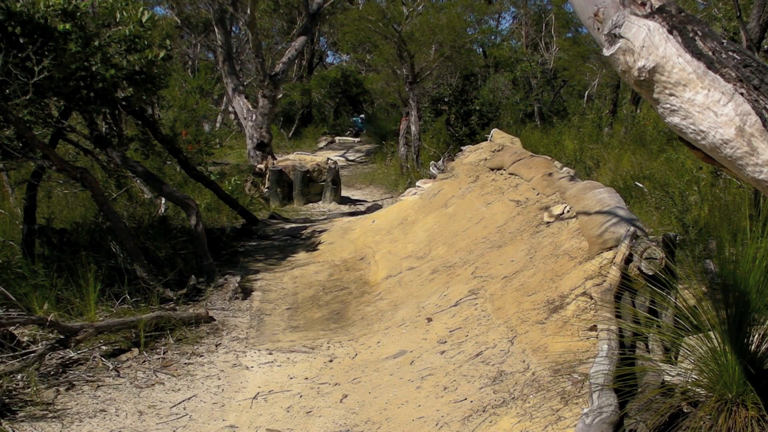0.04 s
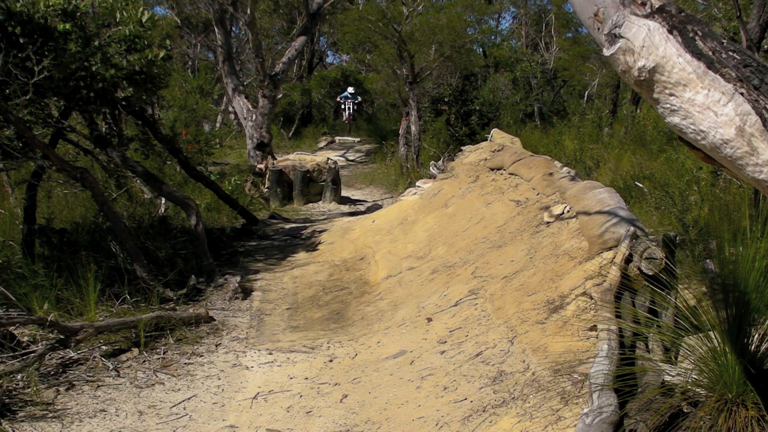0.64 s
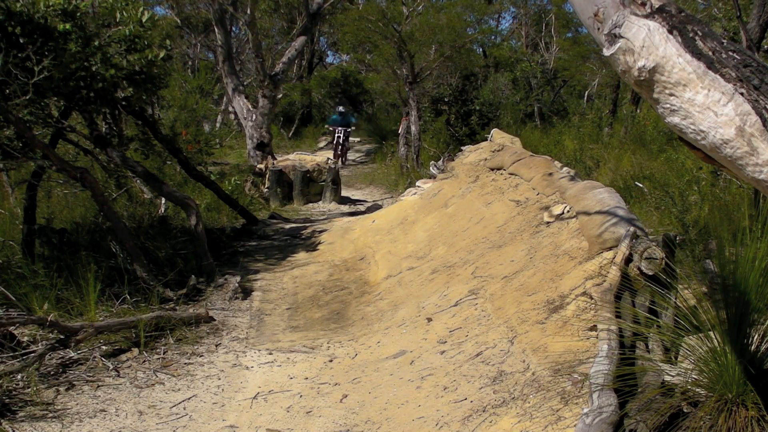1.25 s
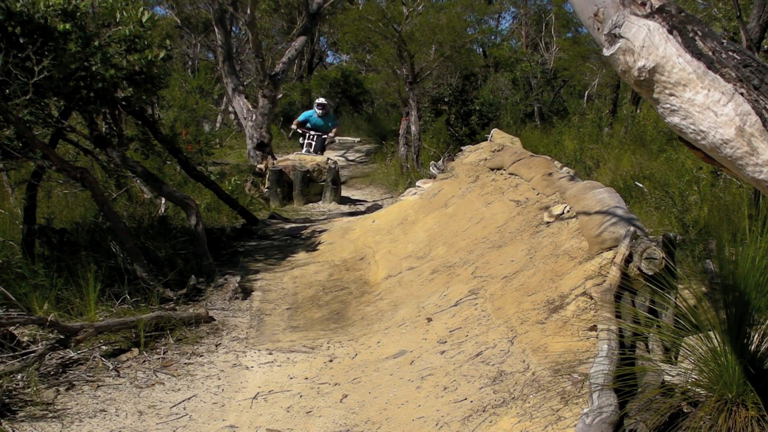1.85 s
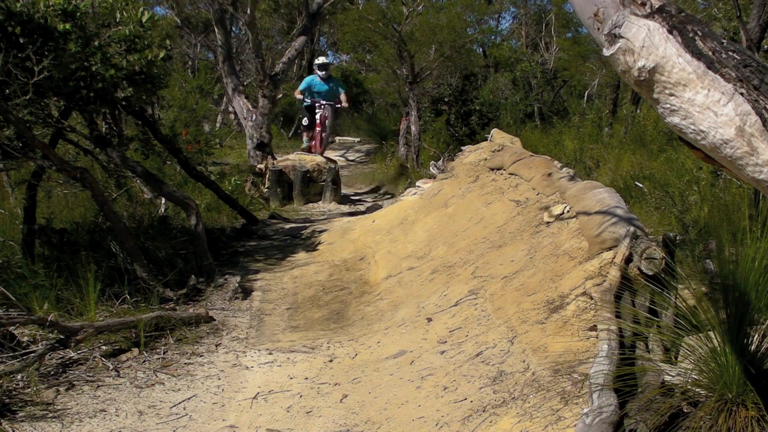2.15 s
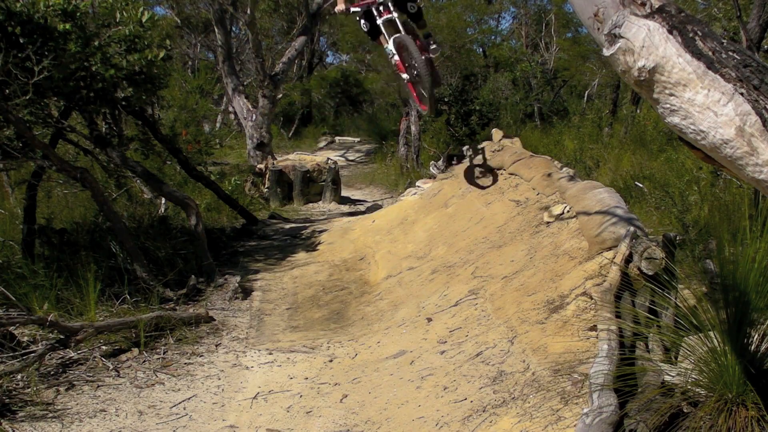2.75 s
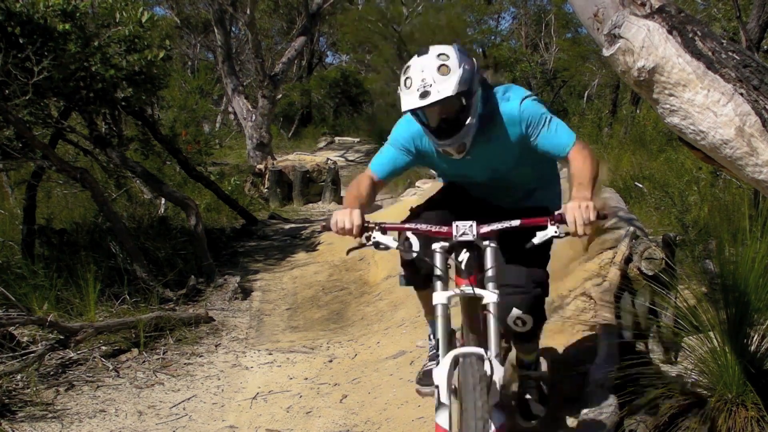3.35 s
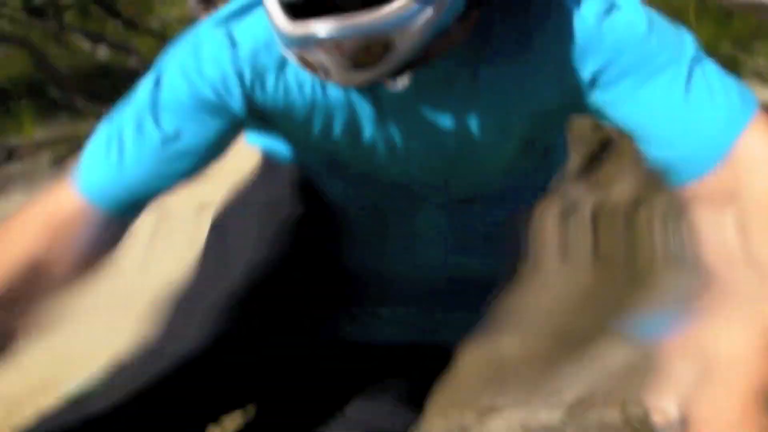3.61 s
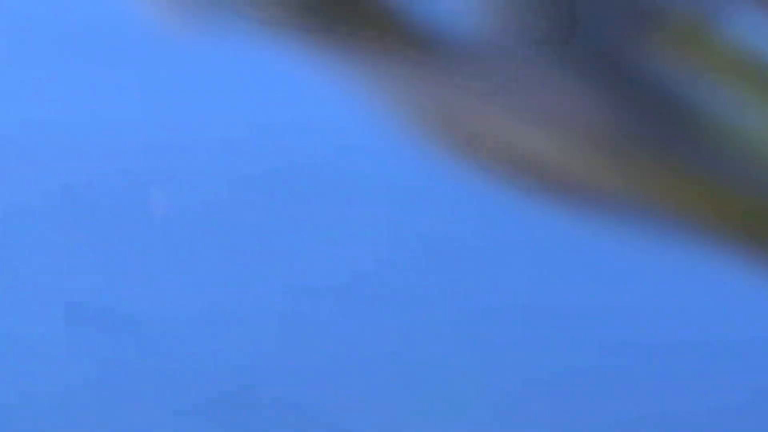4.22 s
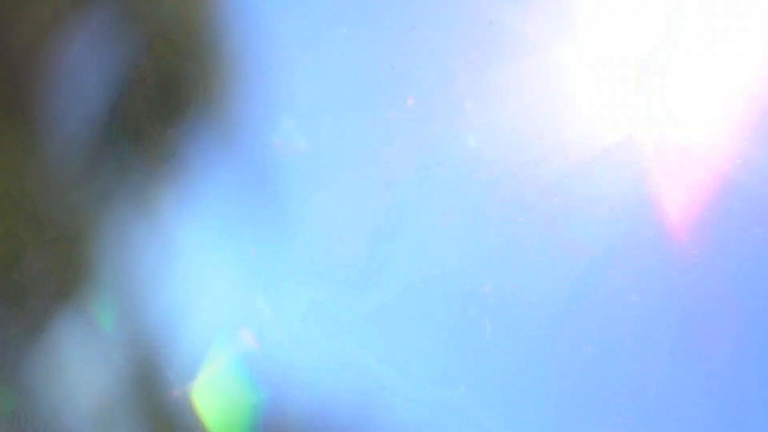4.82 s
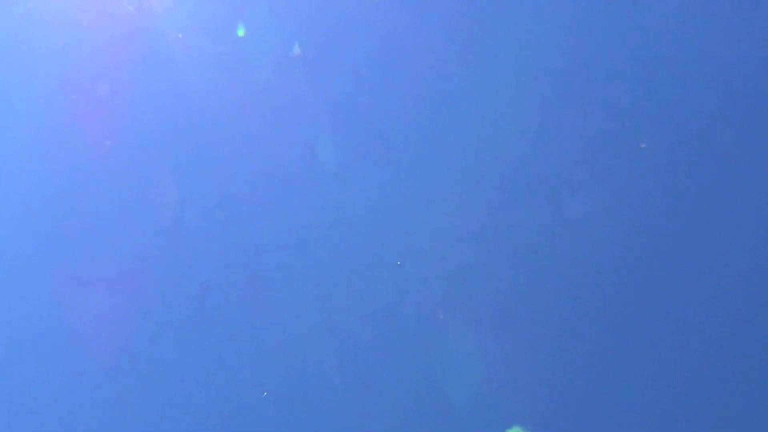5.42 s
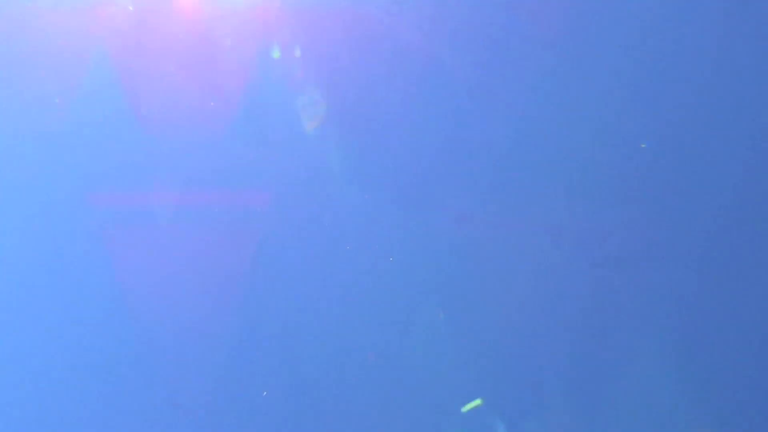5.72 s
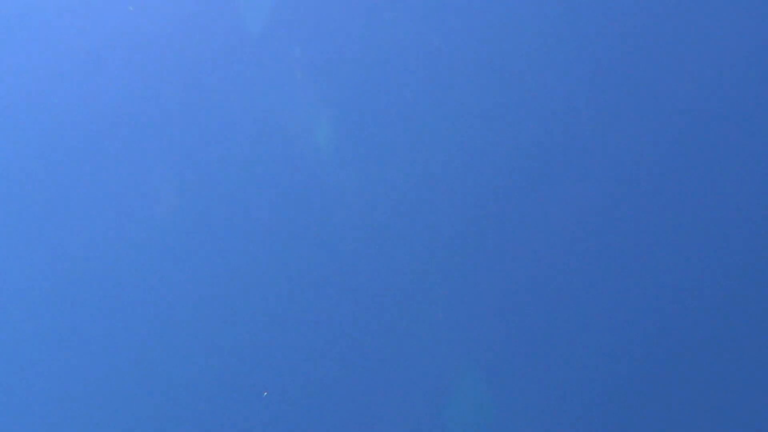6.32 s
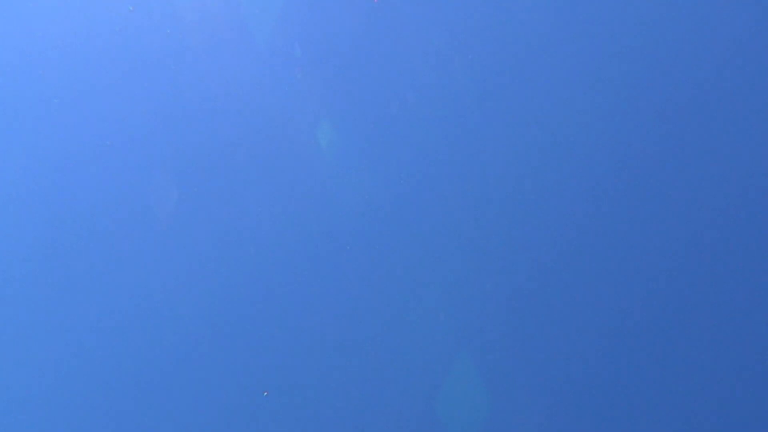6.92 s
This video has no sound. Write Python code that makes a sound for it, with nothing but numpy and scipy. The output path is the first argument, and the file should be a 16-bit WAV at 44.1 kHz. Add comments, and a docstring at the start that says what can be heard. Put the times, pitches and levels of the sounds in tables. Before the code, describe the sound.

Bike tyres crunch closer, land and skid; the microphone is hit and tumbles, clattering through grit, before things settle quietly in the scrub.

```python
"""Tyres hum and crunch on a dirt trail as a mountain bike nears, jumps, lands and skids into a camera.
The camera tumbles through grit and grass, its case knocking and scraping right at the microphone ports.
Then it lies still while bike and rider shift in the scrub with small thuds and clinks.
Rubbing is grainy noise in three bands; a blow is a click, a crunch, a low push and a short ring."""
import sys
import numpy as np
from scipy import signal
from scipy.fft import rfft, irfft, next_fast_len
from scipy.io import wavfile

SR = 44100
rng = np.random.default_rng(int(sys.argv[2]) if len(sys.argv) > 2 else 0)


def store_pcm(level_fs):
    """Save levels as 16-bit WAV."""
    pcm = np.round(np.clip(level_fs, -1, 1) * 32767).astype(np.int16)
    wavfile.write(sys.argv[1], SR, np.atleast_2d(pcm).T)


N = 315744
TIME = np.arange(N) / SR
LANDING_S, COLLISION_S, REST_S = 3.05, 3.528, 5.03


def from_db(db):
    """Decibels to gain."""
    return 10 ** (np.asarray(db) / 20)


def unit_rms(x):
    """Scale to rms 1."""
    return x / np.sqrt(np.mean(x ** 2) + 1e-20)


def unit_blow(blows):
    """Give each blow the energy of 10 ms at rms 1."""
    energy = np.sum(blows ** 2, axis=-1, keepdims=True).mean(axis=1, keepdims=True)
    return blows / np.sqrt(energy / (.01 * SR))


def gain_curve(times, db, fade_s=0.031):
    """Gain through level points, fading outside their span."""
    outside_s = np.maximum(times[0] - TIME, 0) + np.maximum(TIME - times[-1], 0)
    return from_db(np.interp(TIME, times, db)) * np.clip(1 - outside_s / fade_s, 0, 1)


def envelope(start, length, attack_s, release_s):
    """Rise around the start, hold, die away."""
    rise = np.clip((TIME - start) / attack_s + .5, 0, 1)
    return rise * np.exp(-np.clip((TIME - start - length) / release_s, 0, 30))


def drift(per_s):
    """Random wander of rms 1."""
    knots = rng.standard_normal(int(N / SR * 2000))
    return unit_rms(np.interp(TIME * per_s, np.arange(len(knots)), knots))


def at_hz(points, hz):
    """Interpolate on a log-frequency axis."""
    point_hz, value = np.transpose(points)
    return np.interp(np.log(np.maximum(hz, 1)), np.log(point_hz), value)


def resonate(x, hz, width_hz):
    """Two-pole resonance, peak gain 1."""
    r = np.exp(-np.pi * width_hz / SR)
    feedback = [1, -2 * r * np.cos(2 * np.pi * hz / SR), r * r]
    return signal.lfilter(np.array([1, 0, -1]) * (1 - r * r) / 2, feedback, x + 1e-18)


def bands(x):
    """Split into bass, middle and treble."""
    return [signal.sosfilt(signal.butter(4, edges_hz, "band", fs=SR, output="sos"), x)
            for edges_hz in ((15, 550), (550, 2700), (2700, 17000))]


def band_levels(db, bright_db, body_db):
    """Share a level among the bands: brightness tilts towards treble, body lifts the middle."""
    bright_db = np.atleast_1d(bright_db)
    weights = from_db([-bright_db, np.full(bright_db.shape, body_db), bright_db])
    return from_db(db) * weights / np.sqrt(np.sum(weights ** 2, axis=0))


def add_strokes(bed, strokes, attack_s, release_s, body_db):
    """Single strokes add their power to the band levels of a continuous rubbing."""
    power = bed ** 2
    for start, length, db, bright_db in strokes:
        stroke = band_levels(db, bright_db, body_db) * envelope(start, length, attack_s, release_s)
        power = power + stroke ** 2
    return np.sqrt(power)


# likeness of the two ports: f/Hz, correlation
PORT_CORRELATION = [(50, 0.72), (450, 0.92), (1100, 0.83), (2000, 0.96), (4000, 0.49), (12000, 0.055)]


def colour(pair, spectrum):
    """Filter two independent signals at minimum phase; mix to left and right, least alike in treble."""
    size = pair.shape[-1]
    padded = next_fast_len(size + 2048, real=True) // 2 * 2
    hz = np.arange(padded // 2 + 1) * SR / padded
    cepstrum = irfft(np.log(from_db(at_hz(spectrum, hz))))
    cepstrum[1:padded // 2] *= 2
    cepstrum[padded // 2 + 1:] = 0
    filtered = rfft(pair, padded) * np.exp(rfft(cepstrum))
    correlation = at_hz(PORT_CORRELATION, hz)
    mid = filtered[..., 0, :] * np.sqrt(1 + correlation)
    side = filtered[..., 1, :] * np.sqrt(1 - correlation)
    return irfft(np.stack([mid + side, mid - side], axis=-2))[..., :size]


# camera case resonances: f/Hz, width/Hz, boost at full coupling/dB
CASE_MODES = [(153, 16, -0.5), (407, 99, 9), (763, 150, 5.5), (1350, 290, 1.5), (1388, 29, 5),
              (1850, 67, 4), (3040, 540, 5), (5060, 450, 2), (6070, 300, 2.5)]


def case_ring(x, coupling):
    """The case rings along, more with tighter coupling."""
    for hz, width_hz, boost_db in CASE_MODES:
        x = x + (from_db(boost_db * coupling) - 1) * resonate(x, hz, width_hz)
    return x


def grains(per_s, spread_db, sand):
    """Grains of uneven size crack over a bed of fine sand."""
    onsets = rng.random(N) < per_s / SR
    sizes = from_db(spread_db * np.minimum(rng.exponential(1, N), 3))
    cracks = unit_rms(onsets * sizes * rng.standard_normal((2, N)))
    return cracks + sand * rng.standard_normal((2, N))


def crackle(per_s, decay_s):
    """Things break at random, each in a short broadband burst."""
    breaks = (rng.random(N) < per_s / SR) * rng.random(N) + 1e-9
    bursts = signal.lfilter([1], [1, -np.exp(-1 / (decay_s * SR))], breaks)
    return bursts * rng.standard_normal((2, N))


def pebbles(per_s, low_hz, high_hz, q, pitches=18):
    """Stones or twigs tap at random, each ringing briefly at one of a set of pitches."""
    taps = (rng.random(N) < per_s / SR) * rng.standard_normal(N)
    pitch_index = rng.integers(0, pitches, N)
    out = 0
    for k, hz in enumerate(np.geomspace(low_hz, high_hz, pitches)):
        ring = resonate(taps * (pitch_index == k), hz, hz / q) / hz
        out = out + np.stack([ring, np.roll(ring, rng.integers(-1, 2))])
    return unit_rms(out)


def friction(sound, levels, lump_db, lumps_per_s):
    """A rubbing contact catches and slips in lumps, least in the treble."""
    common = drift(lumps_per_s)
    lumps = [from_db(lump_db * depth * (.5 * common + drift(lumps_per_s))) for depth in (.8, 1, .55)]
    return sum(level * unit_rms(band * lump) for level, band, lump in zip(levels, bands(sound), lumps))


# open air: f/Hz, level/dB
AIR_SPECTRUM = [(25, -26), (55, -1), (110, 4.5), (200, -5.5), (280, -13), (420, 1.5), (750, -8),
                (1900, -15), (6000, -16.5), (8000, -21), (16000, -18)]


def air():
    """Steady, faint outdoor noise."""
    return from_db(-54.5) * unit_rms(colour(rng.standard_normal((2, N)), AIR_SPECTRUM))


def drone(start_s=6.3, hz=84, width_hz=10):
    """A faint low rumble sets in near the end."""
    noise = colour(rng.standard_normal((2, N)), AIR_SPECTRUM)
    rumble = resonate(resonate(noise, hz, width_hz), hz, 2 * width_hz)
    return from_db(-53) * unit_rms(rumble) * np.clip((TIME - start_s) / .1, 0, 1)


# bike and rider shifting: t/s, length/s, level/dB, brightness/dB
SCRUB_SHIFTS = [(5.327, 0.029, -40, 3.5), (5.422, 0.094, -44, -2.5), (5.533, 0.13, -43, 6),
                (5.638, 0.037, -38, 1.5), (5.76, 0.067, -40.5, 0), (6.624, 0.0089, -43.5, 5.5),
                (6.747, 0.28, -44.5, 0), (7.079, 0.089, -44.5, 3.5)]


def rustle_levels(attack_s=0.038, cloth_db=-55.5):
    """Debris fades and dulls over a rumble of cloth; each shift stirs it up."""
    age = np.maximum(TIME - REST_S, 0)
    bed = band_levels(db=-43.5 - 5.5 * age, bright_db=2.5 - 2.5 * age, body_db=-1.7)
    bed[0] = np.hypot(bed[0], from_db(cloth_db))
    bed *= np.minimum(age / attack_s, 1)
    return add_strokes(bed, SCRUB_SHIFTS, attack_s, release_s=0.076, body_db=-0.5)


# leaves and sand: f/Hz, level/dB
LEAF_SPECTRUM = [(25, -19), (55, 0.5), (90, 7.5), (150, -2), (260, -7.5), (410, -1.5), (550, -4.5),
                 (750, -5.5), (1000, -4), (1900, -11.5), (3000, -23.5), (6000, -21.5), (7700, -26.5),
                 (14000, -24)]


def scrub():
    """Leaves and sand rustle, twigs tick, dry stalks snap."""
    levels = rustle_levels()
    leaves = colour(grains(per_s=1200, spread_db=2.5, sand=1.7), LEAF_SPECTRUM)
    rustle = friction(case_ring(leaves, coupling=0.52), levels, lump_db=2, lumps_per_s=70)
    twigs = from_db(-4) * levels[1] * pebbles(per_s=70, low_hz=650, high_hz=3200, q=6)
    stalks = colour(crackle(per_s=32, decay_s=.0015), LEAF_SPECTRUM)
    snaps = from_db(-7) * levels[2] * unit_rms(bands(stalks)[2])
    return rustle + twigs + snaps


# brushing wheel: t/s, f/Hz, level/dB
WHEEL_TONE = [(6.1, 520, -81), (6.18, 558, -50), (6.28, 600, -43), (6.36, 582, -53), (6.5, 544, -52),
              (6.58, 526, -65)]


def wheel_hum():
    """A wheel brushes the ground with a rough hum."""
    times, hz, db = np.transpose(WHEEL_TONE)
    phase = 2 * np.pi * np.cumsum(np.interp(TIME, times, hz)) / SR
    hum = unit_rms(drift(170) * np.sin(phase) + drift(170) * np.cos(phase))
    return hum * gain_curve(times, db)


# tyres pressing on the trail: t/s, length/s, level/dB
TYRE_LOADS = [(0.0, 0.13, -54), (0.12, 0.24, -58), (0.458, 0.22, -65.5), (0.959, 0.1, -56.5),
              (1.064, 0.19, -48.5), (1.303, 0.17, -54.5), (1.498, 0.71, -52.5), (1.955, 0.15, -48),
              (2.062, 0.088, -41.5)]


def trail_levels(fall_db_per_s=35, floor_db=-71):
    """Hum follows tyre load; gravel follows less and lingers; sand spray grows until the landing."""
    hum = np.max([from_db(db) * envelope(start, length, attack_s=0.0087, release_s=0.046)
                  for start, length, db in TYRE_LOADS], axis=0)
    load_db = 20 * np.log10(hum + 1e-9) - np.mean([db for _, _, db in TYRE_LOADS])
    fall_db = fall_db_per_s * TIME
    thrown_db = np.maximum.accumulate(-53 + 0.84 * load_db + fall_db) - fall_db
    to_landing_s = np.maximum(LANDING_S - TIME, 0)
    thrown = from_db(thrown_db - to_landing_s)   # gains 1 dB/s as the bike nears
    spray = from_db(-50.5 - 29 * to_landing_s)
    gravel = np.sqrt(thrown ** 2 + spray ** 2 + from_db(floor_db) ** 2)
    return hum, gravel * (TIME < LANDING_S)


# tyre roar and gravel crunch: f/Hz, level/dB
TYRE_SPECTRUM = [(100, -11.5), (170, -18), (225, -7), (290, -12.5), (400, 0), (490, -3), (600, -6),
                 (750, -17), (1500, -43)]
GRAVEL_SPECTRUM = [(400, -4), (800, -4.5), (1900, 0.5), (2700, -4), (6000, -4.5), (7500, -15.5),
                   (11000, -10.5), (16000, -24)]


def tyres():
    """Tread knobs sing at a steady pitch, crunch gravel and flick stones."""
    hum_level, gravel_level = trail_levels()
    roar = unit_rms(colour(grains(per_s=3000, spread_db=5.7, sand=0.84), TYRE_SPECTRUM))
    tread = unit_rms(resonate(roar, hz=469, width_hz=63))
    hum = unit_rms((roar + 0.73 * tread) * from_db(1.5 * drift(41)))
    gravel = colour(grains(per_s=700, spread_db=2.9, sand=2.2), GRAVEL_SPECTRUM)
    crunch = unit_rms(gravel * from_db(1.2 * drift(60)))
    stones = from_db(-15) * pebbles(per_s=30, low_hz=1500, high_hz=6000, q=3)
    return hum_level * hum + gravel_level * (crunch + stones)


# coasting hiss: t/s, level/dB
HISS_LEVELS = [(0, -109), (1.6, -71), (2.0, -68), (2.3, -51), (2.7, -56.5), (3.06, -45.5)]
# its colour: f/Hz, level/dB
HISS_SPECTRUM = [(4000, 4), (7500, 3), (10000, 6.5), (12000, 9.5), (14000, 14.5), (16000, 9.5)]


def coasting():
    """The coasting bike hisses thinly."""
    hiss = unit_rms(colour(rng.standard_normal((2, N)), HISS_SPECTRUM))
    return gain_curve(*np.transpose(HISS_LEVELS)) * hiss


# metal clinks, dry ticks and snaps, a short gritty hiss: t/s, level/dB, f/Hz, t60/s, ring share
CLINKS_AND_SNAPS = [(0.423, -53.5, 5000, 0.18, 0), (.555, -51, 3200, .12, 0),
                    (1.028, -43.5, 3260, 0.039, 0), (1.122, -20, 3200, 0.022, 0.64),
                    (1.1226, -23, 5430, 0.021, 0.53), (1.203, -44, 3300, 0.084, 0),
                    (2.2022, -26.5, 2920, 0.028, 0.5), (2.22, -35.5, 5600, 0.051, 0.03),
                    (2.2771, -29, 1970, 0.031, 0.06), (2.2785, -24.5, 4940, 0.03, 0.14),
                    (3.321, -6.5, 5450, 0.022, 0.54), (4.2822, -10, 11500, 0.021, 0),
                    (4.305, -16.5, 10000, 0.049, 0), (4.714, -30.5, 12100, 0.41, 0.06),
                    (6.138, -42, 1850, 0.24, 0.6), (6.226, -39.5, 2480, .07, 0.24),
                    (6.309, -36.5, 2460, 0.05, 0.43), (6.227, -37, 13000, .07, 0.4),
                    (6.308, -36, 13000, .07, 0.43), (6.572, -39, 11000, 0.097, 0)]


def clinks_and_snaps(size=16384, attack_s=0.00075):
    """Metal clinks ring at one pitch; dry ticks, snaps and a short hiss are decaying noise bands."""
    out = np.zeros((2, N + size))
    age = np.arange(size) / SR
    for start, db, hz, t60, share in CLINKS_AND_SNAPS:
        ring = np.sin(2 * np.pi * hz * age + rng.normal(0, 0.13, (2, 1)))
        noise = unit_rms(resonate(rng.standard_normal((2, size)), hz, 0.73 * hz * (1 - share) + 1))
        level = from_db(db - 60 * age / t60) * (1 - np.exp(-age / attack_s))
        at = int(start * SR)
        out[:, at:at + size] += level * (share * ring + (1 - share) * noise)
    return out[:, :N]


# tyre biting into dirt: t/s, length/s, level/dB, brightness/dB
TYRE_BITES = [(3.058, 0.012, -31.5, 17), (3.104, .035, -28.5, -6), (3.115, 0.072, -23, 12.5),
              (3.385, 0.027, -31.5, -6), (3.426, 0.032, -24.5, 4), (3.487, 0.017, -27.5, -3.5)]
# ploughed dirt: f/Hz, level/dB
DIRT_SPECTRUM = [(25, -19), (70, 2), (170, -2.5), (290, -3), (400, 0.5), (560, 1.5), (900, 2), (1750, 7),
                 (2700, -6), (5400, -4), (7600, -14.5), (11000, -6), (16000, -16)]


def skid(attack_s=0.01, release_s=0.0091, body_db=-2):
    """The tyres land and plough loose dirt, throwing stones and crushing gravel."""
    contact = envelope(LANDING_S, COLLISION_S - LANDING_S, attack_s, release_s)
    bed = band_levels(db=-30, bright_db=2.5, body_db=body_db) * contact
    levels = add_strokes(bed, TYRE_BITES, attack_s, release_s, body_db)
    dirt = colour(grains(per_s=3000, spread_db=2.5, sand=1), DIRT_SPECTRUM)
    plough = friction(case_ring(dirt, coupling=0.2), levels, lump_db=1.5, lumps_per_s=81)
    stones = from_db(-1.5) * levels[1] * pebbles(per_s=150, low_hz=574, high_hz=2500, q=12)
    gravel = from_db(-10) * levels[2] * pebbles(per_s=500, low_hz=3060, high_hz=14300, q=20)
    cracks = colour(crackle(per_s=110, decay_s=.0008), DIRT_SPECTRUM)
    crushed = from_db(-11.5) * levels[2] * unit_rms(cracks)
    return from_db(-2.5) * plough + stones + gravel + crushed


# case digging in: t/s, length/s, level/dB, brightness/dB
CASE_SCUFFS = [(3.562, 0.059, -17.5, 4), (3.673, 0.042, -21, 1.5), (3.735, 0.044, -19, 7),
               (3.868, 0.038, -21, 3.5), (3.982, 0.043, -22.5, 0), (4.114, 0.025, -23.5, -4),
               (4.153, 0.03, -19, 2.5), (4.422, 0.064, -24.5, -0.5), (4.499, 0.03, -20, -3.5),
               (4.542, 0.061, -19, 0.5), (4.616, 0.02, -23, 1.5), (4.798, 0.029, -21, -2),
               (4.842, 0.032, -24.5, -5)]
# plastic on grit: f/Hz, level/dB
PLASTIC_SPECTRUM = [(25, -25), (60, -10), (120, 1), (180, -1), (260, -8.5), (370, 1.5), (600, -7),
                    (1700, -2.5), (2500, -6.5), (6000, 2), (7700, -6.5), (10500, -1.5), (14000, -2),
                    (16000, -11.5)]


def case_slide(length_s=1.478, attack_s=0.028):
    """The case slides, quieter and duller as it slows, scraping harder where a corner digs in."""
    age = np.maximum(TIME - COLLISION_S, 0)
    bed = band_levels(db=-27 - 4.5 * age, bright_db=1 - age, body_db=-2)
    bed *= envelope(COLLISION_S, length_s, attack_s, release_s=0.094)
    levels = add_strokes(bed, CASE_SCUFFS, attack_s, release_s=0.019, body_db=1)
    grit = colour(grains(per_s=1500, spread_db=2, sand=.8), PLASTIC_SPECTRUM)
    scrape = friction(case_ring(grit, coupling=0.4), levels, lump_db=2, lumps_per_s=130)
    stones = from_db(-3.5) * levels[1] * pebbles(per_s=300, low_hz=630.6, high_hz=2205, q=26)
    gravel = from_db(-14.5) * levels[2] * pebbles(per_s=220, low_hz=2800, high_hz=13000, q=10)
    return scrape + stones + gravel


def struck(hz, decay_s, age, skew_rad=0.57):
    """One dying tone per blow, of equal energy, drifting out of phase at the two ports."""
    fade = np.exp(-age / decay_s)
    skew = skew_rad * rng.standard_normal((len(hz), 2, 1)) * (1 - fade)
    return unit_blow(np.sin(2 * np.pi * hz[:, None, None] * age + skew) * fade)


def impact_crunch(decay_s, age, pieces=16, uneven_db=4):
    """Grit breaks in uneven pieces around a click; longer contacts build up more slowly."""
    count, size = len(decay_s), len(age)
    rise_s = .19 * decay_s
    piece_gains = from_db(uneven_db * rng.standard_normal((count, 1, pieces)))
    crunch = np.repeat(piece_gains, size // pieces, axis=-1) * rng.standard_normal((count, 2, size))
    crunch *= np.exp(-age / decay_s) * (1 - np.exp(-age / rise_s))
    click_at = (2 * rise_s.ravel() * SR).astype(int)
    crunch[np.arange(count), 0, click_at] += 4 * rng.choice([-1, 1], count)
    return crunch


# bike's weight dropping on dirt: t/s, level/dB, brightness/dB
BIKE_THUDS = [(3.0415, -29, -5), (5.4571, -33, -11.5), (5.6976, -28.5, -4), (5.805, -27.5, -7),
              (5.8706, -38, -7), (6.1211, -37, -8), (6.5721, -30, -17.5), (6.744, -42, -7),
              (7.0985, -39, -4)]
THUD_DECAY_S, THUD_RINGS_HZ = 0.00557, (763, 1100)
# bike, stone, twig and case hits: t/s, level/dB, brightness/dB, decay/s, main f/Hz, second f/Hz
HARD_KNOCKS = [(1.3935, -41, -4, 0.0049, 1630, 2100), (1.509, -43, -11, 0.011, 1610, 1110),
               (3.059, -28.5, 7, 0.0036, 1610, 815), (3.1311, -22, 13, .0018, 1745, 3340),
               (3.173, -24.5, 4, 0.0035, 2450, 1280), (3.3213, -23.5, 25, 0.00061, 5500, 2470),
               (3.389, -30, 16, 0.0013, 964, 6150), (3.4365, -16.5, 6.5, 0.0052, 1274, 1830),
               (3.447, -24, 5, 0.004, 1770, 1518), (3.472, -20.5, 2, .003, 1710, 1400),
               (3.5702, -8.5, 2, .0057, 799, 1567), (3.581, -10.5, 9, 0.0049, 715, 1590),
               (3.603, -17, 11, .001, 1390, 2874), (3.6282, -18.5, 8.5, 0.0012, 2100, 1280),
               (3.6572, -22, 5, 0.002, 1530, 1770), (3.6821, -13.5, 15, 0.0067, 1787, 1281),
               (3.7015, -17.5, 2, .0017, 1900, 1500), (3.7514, -18, 0, 0.0045, 1798, 3230),
               (3.7645, -18.5, 17, 0.001, 2970, 1500), (3.7742, -17, 3, .001, 1700, 3080),
               (3.784, -18, 12, 0.0012, 2180, 1100), (3.7928, -16.5, 18, .0025, 4420, 5700),
               (3.816, -18.5, -14, .0083, 538, 2020), (3.8847, -15.5, 13, 0.00099, 1420, 1700),
               (3.928, -14.5, 7, 0.0017, 2020, 1790), (3.9452, -19.5, 9, 0.0052, 1350, 2920),
               (3.9927, -20, -3, 0.0018, 1390, 684), (4.0254, -21, 3, .0035, 1360, 1550),
               (4.0377, -17.5, 0.5, 0.0037, 721, 1430), (4.1306, -15.5, -2.5, 0.004, 1514, 700),
               (4.1434, -18.5, -19, 0.008, 538, 1010), (4.1625, -18, -2, 0.0059, 1001, 2290),
               (4.2002, -15.5, 18, 0.0012, 1350, 3370), (4.2065, -20.5, 10, .0022, 1100, 5760),
               (4.235, -22.5, 5, 0.002, 800, 1720), (4.2822, -25.5, 16, 0.0016, 1020, 3660),
               (4.3492, -16.5, 11.5, 0.0021, 2060, 1330), (4.3541, -18, 5, 0.0074, 1277, 1156),
               (4.514, -26, 0, .003, 1380, 800), (4.5243, -15.5, -1, 0.0026, 780, 650),
               (4.549, -19, 2, 0.0045, 1820, 1960), (4.5821, -14, 8.5, 0.0033, 1440, 990),
               (4.6015, -21.5, 8, 0.0023, 680, 1582), (4.633, -18, -9.5, 0.0036, 1620, 930),
               (4.8055, -17.5, -1.5, 0.004, 1180, 940), (4.8126, -13, 0.5, 0.0078, 1125, 1750),
               (4.8265, -12, -0.5, 0.0053, 1143, 686), (4.8544, -13, -8, 0.0036, 1865, 1065),
               (4.8829, -20.5, -1.5, 0.0043, 750, 1220), (4.9281, -19.5, -2.5, 0.0036, 706, 1320),
               (5.0425, -26.5, 0, 0.0031, 956, 1410), (7.0275, -30, 15, 0.0031, 1455, 4300)]


def knocks(size=4096, cavity_hz=402):
    """Each blow crunches, pushes on the ground and rings at two pitches; the hollow case adds a bonk."""
    thuds = [(*row, THUD_DECAY_S, *THUD_RINGS_HZ) for row in BIKE_THUDS]
    starts, db, bright_db, decay_s, main_hz, second_hz = np.transpose(list(HARD_KNOCKS) + thuds)
    count, decay_s = len(starts), decay_s[:, None, None]
    age = np.arange(size) / SR
    crunch = colour(impact_crunch(decay_s, age), PLASTIC_SPECTRUM)
    thump, clack, crack = bands(case_ring(crunch, coupling=0.8))
    push = struck(hz=rng.uniform(112, 201, count), decay_s=0.0089, age=age)
    side_hz = cavity_hz * np.exp(0.063 * rng.standard_normal(count))   # varies with the side struck
    bonk = struck(side_hz, decay_s=0.008, age=age)
    tumbling = ((starts > COLLISION_S) & (starts < REST_S))[:, None, None]
    thump = unit_blow(thump) + 0.47 * push + 0.66 * tumbling * bonk
    ring_s = decay_s + 0.0018
    ring = struck(main_hz, ring_s, age) - 0.65 * struck(second_hz, ring_s, age)
    clack = unit_blow(clack) + 1.18 * unit_blow(ring)
    stone_hz = np.exp(rng.uniform(np.log(3500), np.log(13000), count))
    crack = np.array([hit + 1.5 * resonate(hit, hz, width_hz=720) for hit, hz in zip(crack, stone_hz)])
    body_db = 7 + 0.47 * np.maximum(db - np.median(db), 0)   # harder blows ring more
    levels = band_levels(db, bright_db, body_db)[..., None, None]
    blows = sum(unit_blow(part) * level for part, level in zip((thump, clack, crack), levels))
    out = np.zeros((2, N + size))
    for at, blow in zip((starts * SR).astype(int), blows):
        out[:, at:at + size] += blow
    return out[:, :N]


def port_lag(pair, lag_s=.000035):
    """Once the camera lies still, sound reaches the right port slightly later."""
    left, right = pair
    hz = np.arange(N // 2 + 1) * SR / N
    delayed = irfft(rfft(right) * np.exp(-2j * np.pi * hz * lag_s), N)
    return np.stack([left, np.where(TIME > REST_S, delayed, right)])


def scene():
    """Ride, crash and settling, slightly to the left, in open air."""
    background = air()
    crash = skid() + case_slide() + knocks() + clinks_and_snaps()
    background += drone()
    ride = (tyres() + coasting() + crash) * from_db([[.25], [-.25]])
    settling = (scrub() + wheel_hum()) * from_db([[.8], [-.8]])
    return background + port_lag(ride + settling)


def record(dry, cutoff_hz=16000):
    """The hardest blows overload the input; a steep low-pass cuts the top."""
    lowpass = signal.ellip(10, .1, 70, cutoff_hz, fs=SR, output="sos")
    return signal.sosfilt(lowpass, np.clip(dry, -1, 1))


dry = scene()
out = record(dry)
store_pcm(out)
```